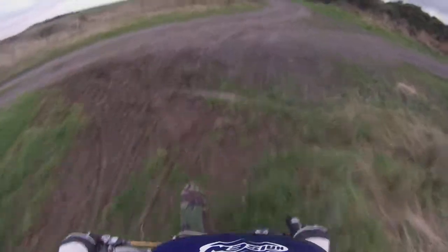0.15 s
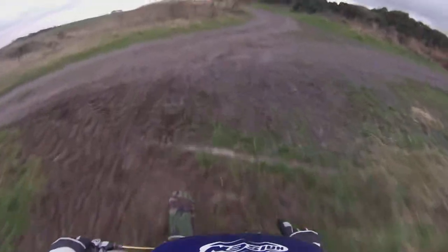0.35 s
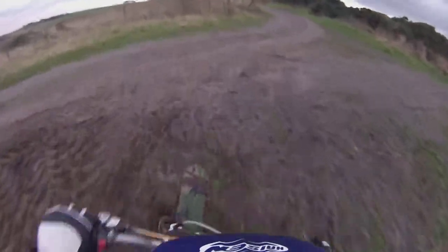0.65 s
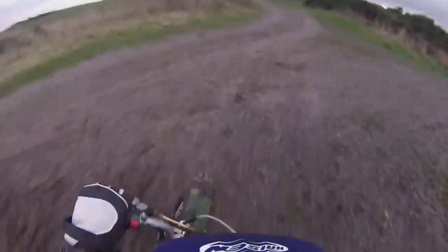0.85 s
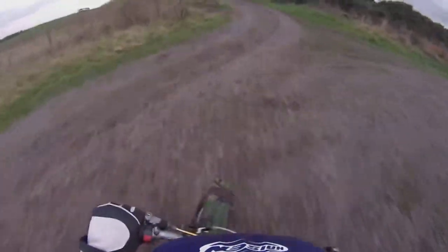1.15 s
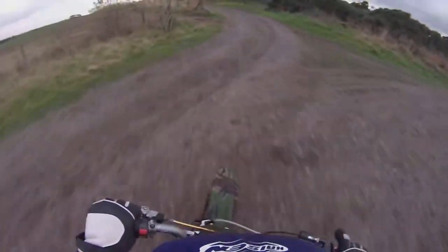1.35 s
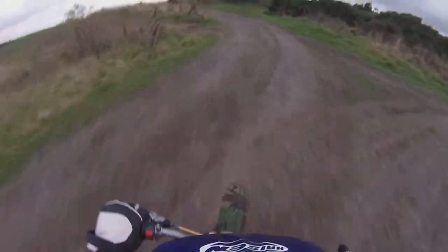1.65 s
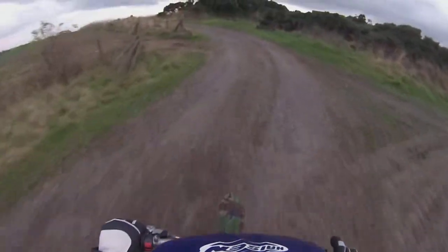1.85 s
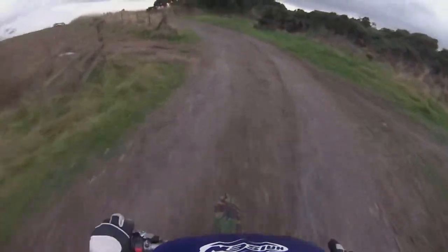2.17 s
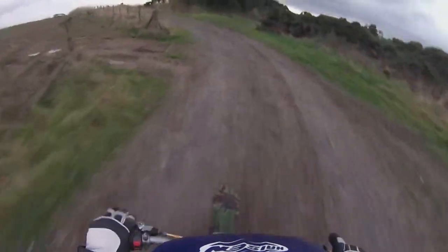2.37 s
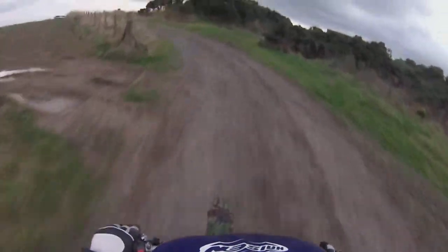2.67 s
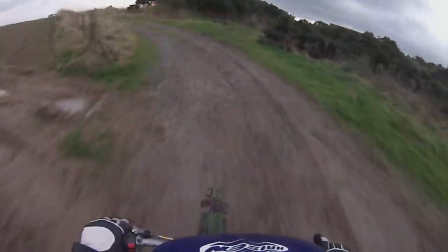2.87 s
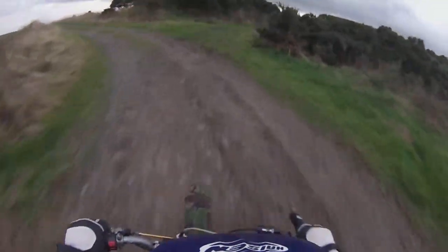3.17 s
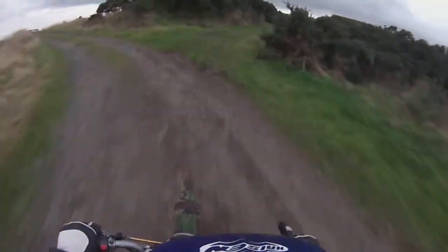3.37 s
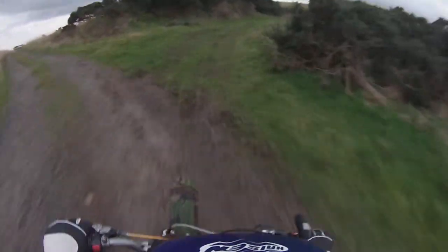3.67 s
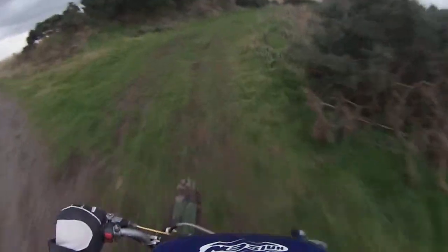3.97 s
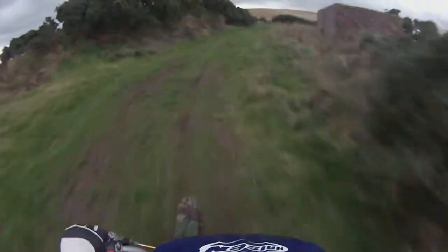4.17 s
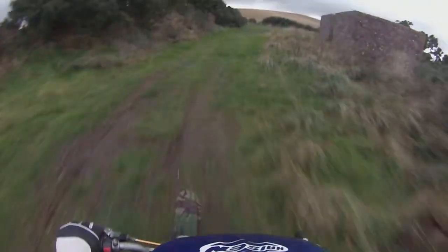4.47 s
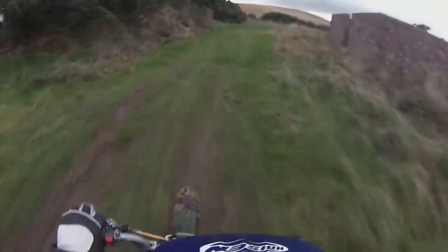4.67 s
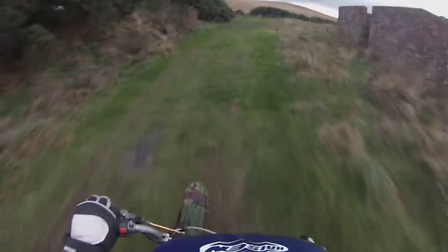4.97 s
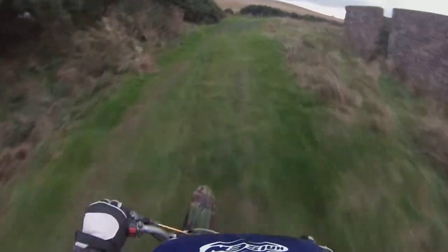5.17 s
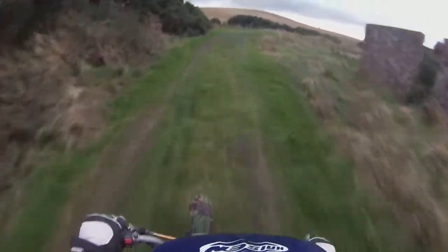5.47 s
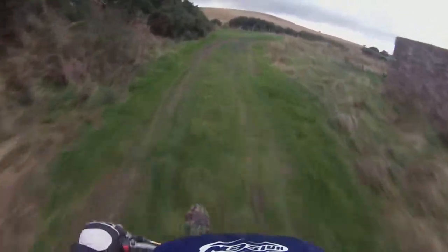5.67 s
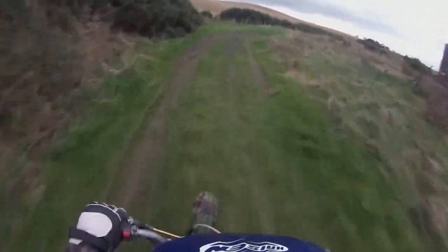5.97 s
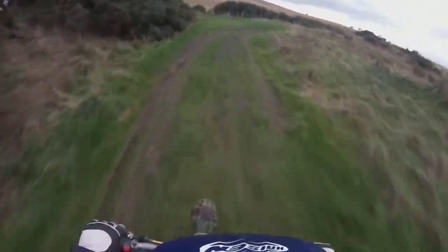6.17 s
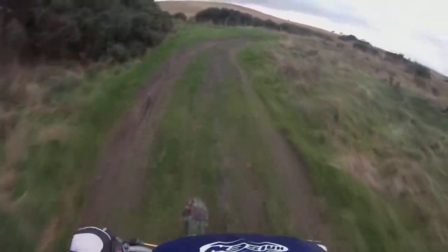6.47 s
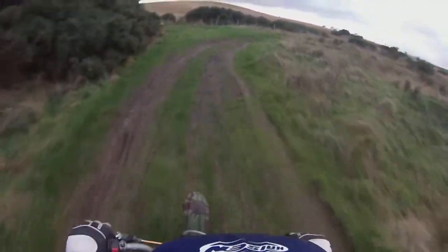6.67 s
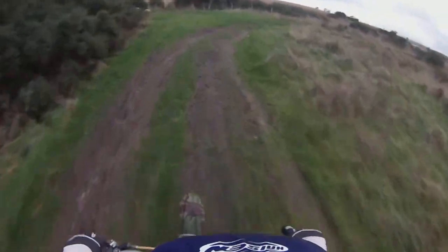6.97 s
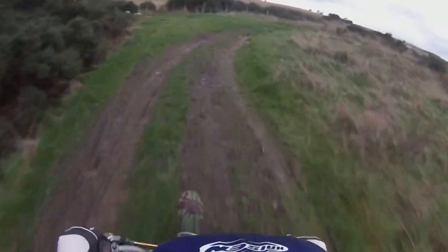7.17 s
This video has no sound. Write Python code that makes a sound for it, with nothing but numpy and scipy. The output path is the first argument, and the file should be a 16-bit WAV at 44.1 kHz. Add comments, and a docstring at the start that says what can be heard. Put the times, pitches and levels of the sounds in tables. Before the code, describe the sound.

Close on board a small four-stroke dirt bike, the engine putters low, then opens into a harsh rasping climb. The throttle snaps shut and the pitch falls, then it barks again with one quick dip. Finally it coasts down to a soft hum and clatter, with wind rumble, tyre churn, swishing grass and small knocks outdoors.

```python
"""A small four-stroke single-cylinder pit bike rides along a field track, heard from the rider's position.
It pulls up through the revs, shuts off briefly, pulls again, then coasts with the throttle nearly shut.
Each firing rings the exhaust and shakes out a rasp of noise, as strongly as throttle and engine speed dictate.
Gulps of air ring the air box, the engine clatters and hums, and bumps knock loose parts and chassis.
Shaped noise makes the tyres' churn, the swish of grass and the wind that buffets the microphone."""
import sys
import numpy as np
from scipy.fft import rfft, irfft, next_fast_len
from scipy.io import wavfile
from scipy.ndimage import uniform_filter1d, map_coordinates

SR = 44100
rng = np.random.default_rng(int(sys.argv[2]) if len(sys.argv) > 2 else 0)


def transcribe(signal):
    """Save signal, clipped to [-1, 1], as a 16-bit WAV file at the path in sys.argv[1]."""
    frames = np.atleast_2d(signal).T
    limited = np.clip(frames, -1, 1)
    pcm = np.round(limited * 32767).astype(np.int16)
    wavfile.write(sys.argv[1], SR, pcm)


N = 323253  # length in samples
TIME = np.arange(N) / SR  # seconds


def amp(db):
    """Turn decibels into gain."""
    return 10 ** (np.asarray(db) / 20)


def unit(x):
    """Scale a sound to an average (rms) level of 1."""
    return x / np.sqrt(np.mean(x ** 2) + 1e-20)


def curves(rows):
    """Join the points of each column after the time by straight lines, one value per sample."""
    point_s, *columns = np.transpose(rows)
    return [np.interp(TIME, point_s, column) for column in columns]


def wobble(rate):
    """Draw a smooth random curve through `rate` random points a second."""
    points = rng.standard_normal(int(N * rate / SR) + 4)
    return map_coordinates(points, [TIME * rate])


def filtered(x, response):
    """Filter x by a response that depends on frequency in Hz."""
    padded = next_fast_len(N + SR // 2)  # room for the ringing to die away
    hz = np.fft.rfftfreq(padded, 1 / SR)
    return irfft(rfft(x, padded) * response(hz), padded)[:N]


def coloured(x, spectrum):
    """Filter x to a spectrum of (pitch_hz, level_db) points, then scale to rms 1."""
    pitch_hz, level_db = np.transpose(spectrum)

    def response(hz):
        return amp(np.interp(np.log(hz + 1), np.log(pitch_hz), level_db))
    return unit(filtered(x, response))


def noise(spectrum):
    """Make steady random noise of the given spectrum, at rms 1."""
    return coloured(rng.standard_normal(N), spectrum)


def resonance(hz, centre, width):
    """Response of one part that rings at `centre` Hz; a narrower width in Hz rings longer."""
    return 1j * hz * width / (centre ** 2 - hz * hz + 1j * hz * width)


def resonate(x, modes, soft_hz, delay=0, alternate=False):
    """Let x, softened above soft_hz, ring the modes; alternating signs make the ring swell more slowly."""
    def response(hz):
        ring = 0
        for k, (pitch_hz, width_hz, level_db) in enumerate(modes):
            sign = (-1) ** (k * alternate)
            ring = ring + sign * amp(level_db) * resonance(hz, pitch_hz, width_hz)
        softening = np.exp(-(hz / soft_hz) ** 2)
        return ring * softening * np.exp(-2j * np.pi * hz * delay)  # delay in seconds
    return unit(filtered(x, response))


def gated(gate):
    """Shape white noise by a gate, evening out the gate's slow rise and fall."""
    slow_power = uniform_filter1d(gate ** 2, size=4410)  # averaged over 0.1 s
    return rng.standard_normal(N) * gate / np.sqrt(np.abs(slow_power))


def loudness(law, throttle, rate):
    """Gain of a layer, from throttle opening and engine speed."""
    # law: level_db at full throttle and cruising speed, loss_db on shutting, gain_db per doubling of speed
    full_db, shut_loss_db, db_per_octave = law
    cruise_rate = 50  # firings a second
    return amp(full_db - shut_loss_db * (1 - throttle) + db_per_octave * np.log2(rate / cruise_rate))


def combustion(throttle):
    """Strength of the firings, 0-1: a shut throttle leaves almost nothing to burn."""
    idle_opening, misfire_db = 0.18, 24  # firings fade below this opening, by this much when fully shut
    return amp(-misfire_db * np.clip(1 - throttle / idle_opening, 0, 1))


def pulses(times, scatter_db, jitter):
    """Make one click per firing or gulp, varying randomly in level (dB) and timing (s)."""
    chance = rng.standard_normal((len(times), 2))
    position = (times + jitter * chance[:, 0]) * SR
    # a short windowed sinc places each click between samples
    taps = np.floor(position)[:, None] + np.arange(-7, 9)
    offset = taps - position[:, None]
    shape = np.sinc(offset) * np.sinc(offset / 8) * amp(scatter_db * chance[:, 1:])
    samples = np.clip(taps, 0, N).astype(int)
    return np.bincount(samples.ravel(), shape.ravel(), N + 1)[:N]


def exhaust(times, throttle, rate):
    """Each burst of exhaust gas rings the pipe; an open throttle makes higher modes speak."""
    # resonances of the exhaust: pitch_hz, width_hz, level_db (relative)
    boom_modes = [(117.5, 37.4, 0)]
    putter_modes = [(167, 570, 0)]
    thump_modes = [(274, 68, -4.5), (347, 56, 3.5), (406.5, 64, 6), (413, 62, 0)]
    bark_modes = [(611, 91, 7), (686, 48, -9.5), (806.5, 27.5, 5), (1077, 51, 0.5)]
    crack_modes = [(1257, 117, 4), (1431, 147, 4.5), (1613, 83, 4.5), (1930, 75, -28)]
    # how loudness follows the engine: full_throttle_db, shut_loss_db, gain_db_per_octave of speed
    boom_law = (-30, 11.1, 5.6)
    putter_law = (-46, -6, -14)
    thump_law = (-23.5, 8.4, 2.7)
    bark_law = (-28.5, 16, 11.4)
    crack_law = (-28.5, 21.7, 6.1)

    firing = combustion(throttle)
    puffs = pulses(times, scatter_db=0.37, jitter=.00003)
    boom = loudness(boom_law, throttle, rate) * resonate(puffs, boom_modes, soft_hz=340)
    putter = loudness(putter_law, throttle, rate) * resonate(puffs, putter_modes, soft_hz=367)
    thump = loudness(thump_law, throttle, rate) * resonate(puffs, thump_modes, soft_hz=625)
    bark = loudness(bark_law, throttle, rate) * resonate(puffs, bark_modes, soft_hz=1360)

    def silencer(hz):  # cancels a narrow band
        return 1 - resonance(hz, centre=515.3, width=64)
    pipe = filtered(boom + firing * (putter + thump + bark), silencer)

    # the steep front cracks at once, and again, less evenly, after its trip along the pipe and back
    front_pulses = pulses(times, scatter_db=2.0, jitter=.00004)
    front = resonate(front_pulses, crack_modes, soft_hz=2560, alternate=True)
    return_pulses = pulses(times, scatter_db=5.0, jitter=0.00024)
    again = resonate(return_pulses, crack_modes, soft_hz=2600, delay=0.003124, alternate=True)
    crack = loudness(crack_law, throttle, rate) * (front + .65 * again)
    return -pipe - firing * crack


def intake(times, throttle, rate):
    """Half a cycle after each exhaust burst the piston gulps air, which favours the even harmonics."""
    # the air box, rung by each gulp: pitch_hz, width_hz, level_db (relative)
    air_box = [(312.6, 35, 0)]
    # loudness: full_throttle_db, shut_loss_db, gain_db_per_octave of speed
    intake_law = (-36.5, 18, 5)
    halfway = (times[:-1] + times[1:]) / 2
    gulps = pulses(halfway, scatter_db=2.5, jitter=.00005)
    level = combustion(throttle) * loudness(intake_law, throttle, rate)
    return -level * resonate(gulps, air_box, soft_hz=520)


def overrun(cycle, throttle, rate):
    """With the throttle shut the wheel turns the engine, whose pumping hums at multiples of its firing rate."""
    # the hum by engine speed: firings_per_s, level_db, high_rev_colour_share (0-1), waver_radians
    hum_by_speed = [(36.3, -48.5, 0, 1), (43.4, -35, 0.04, 0.53), (50, -40, 1, 0.47), (53.4, -37.5, 1, .2)]
    # the strength of each harmonic: multiple of the firing rate, low_rev_db, high_rev_db (both relative)
    hum_orders = [(2, 2, -11), (3, -3, -7), (4, -12.5, 3), (5, -7, -0.5), (6, -8.5, -3.5), (7, -12, -6),
                  (8, -18, -33), (9, -7, -22), (11, -18, -27), (12, -22, -13)]
    speeds, *columns = np.transpose(hum_by_speed)
    level_db, high_share, waver = [np.interp(rate, speeds, column) for column in columns]
    hum = 0
    for order, low_db, high_db in hum_orders:
        order_db = low_db + high_share * (high_db - low_db) + 2.9 * wobble(8.3)
        phase = 2 * np.pi * order * cycle + waver * wobble(16)
        hum = hum + amp(order_db) * np.cos(phase)
    return -np.sqrt(2) * (1 - combustion(throttle)) * amp(level_db) * hum


def burst(age, delay, width):
    """A swell that peaks when age equals delay and dies more slowly than it rose."""
    return np.exp(-.5 * (np.log((age + 1e-5) / delay) / width) ** 2)


def gas_and_clatter(times, cycle, throttle, rate):
    """Turbulent gas follows each firing; valve gear and chain keep clattering when the throttle is shut."""
    # spectra of the noises: pitch_hz, level_db (relative, per Hz)
    clatter_spectrum = [(700, -24.5), (1050, -19), (1300, -1), (1500, -1.5), (1750, -8), (2060, 2),
                        (2330, -9.5), (2650, -15), (3200, -28.5), (4500, -52)]
    rasp_spectrum = [(450, -47), (700, 1.5), (1000, -7), (1130, -16), (1290, 5), (1450, 3.5), (1620, -3),
                     (1800, 1), (2060, 5.5), (2300, -1), (2600, -18), (4500, -56.5)]
    hiss_spectrum = [(1800, -30), (2800, 0), (3500, 1), (4250, -2.5), (4750, -1), (5600, -9.5),
                     (6600, -19.5), (7700, -17), (9000, -24.5), (11500, -38), (13000, -56), (15000, -63)]
    # ringing of fins and engine covers: pitch_hz, width_hz, level_db (relative)
    casing_modes = [(2980, 104, 7), (3854, 150, 4), (4720, 180, -2.5), (5730, 170, -2.5), (6570, 450, -2.5),
                    (9030, 1000, -8), (10800, 910, -9)]
    # loudness: full_throttle_db, shut_loss_db, gain_db_per_octave of speed
    clatter_law = (-33.5, 5.6, 8.8)
    rasp_law = (-29.5, 17, 6)
    hiss_law = (-45.5, 12.2, 15.7)
    casing_law = (-50, 8.2, 5.2)

    last_firing = np.r_[-1, times][np.searchsorted(times, TIME)]
    age = TIME - last_firing  # seconds
    valves = burst(cycle % 1, delay=0.688, width=0.023)  # a valve seats late in every cycle
    clatter_gate = amp(1.6 * wobble(160)) * (1 + 0.25 * valves)
    clatter = coloured(gated(clatter_gate), clatter_spectrum)

    force = np.sqrt(throttle) * amp(1.6 * wobble(50))
    rasp_gate = force * burst(age, delay=0.0029, width=0.76) + 0.0082
    rasp = combustion(throttle) * coloured(gated(rasp_gate), rasp_spectrum)

    spit = 3 * burst(age, delay=.0008, width=.6) + 1.5 * burst(age, delay=.005, width=.5)
    hiss = coloured(gated(amp(1.6 * wobble(160)) + force * spit), hiss_spectrum)
    casing_gate = amp(2.7 * wobble(220)) * (1 + 0.71 * force * spit)
    casing = resonate(gated(casing_gate), casing_modes, soft_hz=8560, alternate=True)

    layers = [(clatter, clatter_law), (rasp, rasp_law), (hiss, hiss_law), (casing, casing_law)]
    return sum(sound * loudness(law, throttle, rate) * amp(.7 * wobble(8)) for sound, law in layers)


def wind():
    """Lumpy low noise of air buffeting the microphone, with gusts and lulls."""
    # gusts and lulls: middle_s, half_length_s, level_db over the breeze
    gusts = [(0.857, 0.28, 9), (1.7, 0.59, -3.5), (4.206, .7, 6.5), (5.544, .5, 8), (6.71, 0.059, 4.5)]
    # spectrum of the buffeting: pitch_hz, level_db (relative, per Hz)
    buffet_spectrum = [(6, -7), (18, 7.5), (35, -16), (55, -11), (85, -5.5), (150, -22), (300, -25),
                       (700, -43.5), (2000, -78)]
    wind_db = -34  # the breeze between gusts
    for middle_s, half_s, level_db in gusts:
        wind_db = wind_db + level_db * np.exp(-((TIME - middle_s) / half_s) ** 2)
    return amp(wind_db) * unit(amp(1.4 * wobble(9.8)) * noise(buffet_spectrum))


def tyres(throttle, rate):
    """Knobbly tyres churn the track as lumpy noise, louder as the bike works harder."""
    # spectrum of the churn: pitch_hz, level_db (relative, per Hz)
    churn_spectrum = [(50, -4), (85, 10), (170, 0), (290, 1), (420, 3), (510, -5.5), (620, -9.5),
                      (900, -10), (1300, -4), (3000, -42.5)]
    # loudness: full_throttle_db, shut_loss_db, gain_db_per_octave of speed
    churn_law = (-37.5, 3.8, 3.6)
    lumps_db = 1.8 * wobble(25)
    return loudness(churn_law, throttle, rate) * amp(lumps_db) * noise(churn_spectrum)


def grass():
    """Grass brushing past makes a flickering swish of noise."""
    # rush of the bike through grass: time_s, level_db
    grass_levels = [(3.6, -63), (3.85, -37.5), (4.3, -33), (5.3, -32.5), (5.65, -30.5), (6.03, -38),
                    (6.25, -34), (6.4, -43), (6.8, -52), (7.0, -43.5), (7.33, -48)]
    # spectrum of the swish: pitch_hz, level_db (relative, per Hz)
    swish_spectrum = [(350, -40), (600, -9), (765, -14), (974, -18), (1310, 1), (1520, -3.5), (2020, -5.5),
                      (3750, -21.5), (4230, -26), (6600, -30), (8520, -44), (11000, -46), (15000, -69)]
    grass_db, = curves(grass_levels)
    return amp(grass_db + 1.2 * wobble(30)) * noise(swish_spectrum)


def after(events, t60):
    """Rise in about a millisecond at each (start_s, level_db), then fall 60 dB every t60 seconds."""
    envelope = 0
    for start_s, level_db in events:
        age = np.maximum(TIME - start_s, 0)
        rise = 1 - np.exp(-(age / .001) ** 2)
        envelope = envelope + amp(level_db - 60 * age / t60) * rise
    return envelope


def rattles():
    """Bumps shake bright ticks and duller knocks out of the bike, as short bursts of noise."""
    # bright ticks of loose parts: start_s, level_db (before the trim below)
    jolts = [(1.4376, -34), (1.943, -35), (3.8994, -41), (6.5286, -45), (6.6844, -38)]
    # knocks of the chassis over bumps: start_s, level_db (before the trim below)
    chassis_knocks = [(3.499, -22.5), (6.2542, -23), (6.9321, -31)]
    tick_spectrum = [(1500, -32), (4000, 7), (7000, -2), (11000, -14), (15000, -28)]
    knock_spectrum = [(500, -32), (1000, -3), (1350, 9), (2100, -7), (3500, -24), (12000, -85)]
    ticks = after(jolts, t60=.06) * noise(tick_spectrum)
    knocks = after(chassis_knocks, t60=0.036) * noise(knock_spectrum)
    return amp(-13.5) * ticks + amp(-2.5) * knocks


def scene():
    """The crank sets the firing times; throttle and speed set the strength of every engine sound."""
    # engine speed: time_s, firings_per_s
    speed_points = [(0.0, 35.11), (0.6, 39.72), (0.72, 42.31), (0.91, 39.48), (1.23, 42.87), (1.38, 39.06),
                    (1.5, 42.64), (1.6, 42.02), (1.67, 45.24), (2.14, 52.1), (2.25, 55.74), (2.38, 55.61),
                    (2.48, 58.65), (2.55, 57.76), (3.1, 63.1), (3.34, 55.46), (3.58, 43.57), (3.66, 45.2),
                    (4.1, 47.0), (4.22, 43.57), (4.35, 46.41), (4.55, 45.91), (4.84, 49.64), (5.02, 49.27),
                    (5.26, 51.78), (5.48, 43.98), (6.44, 36.61), (7.33, 36.32)]
    # the rider's hand: time_s, throttle_opening (0-1)
    throttle_points = [(0, .16), (.35, 0.17), (.75, 0.38), (.95, 0.39), (1.2, 0.43), (1.4, 0.35),
                       (1.49, 0.81), (1.82, 0.88), (2.3, .8), (3.09, 0.84), (3.19, 0.08), (3.55, 0.05),
                       (3.7, 0.76), (3.98, 0.9), (4.19, 0.12), (4.3, 0.92), (5.25, 0.91), (5.34, 0.09),
                       (6.6, 0), (7.33, 0.07)]
    rate, = curves(speed_points)
    throttle = np.clip(curves(throttle_points)[0], 0, 1)
    cycle = np.cumsum(rate) / SR + .534  # running count of engine cycles, one firing in each
    times = np.interp(np.arange(1, int(cycle[-1]) + 1), cycle, TIME)  # firing times in seconds
    engine = exhaust(times, throttle, rate) + intake(times, throttle, rate)
    engine = engine + overrun(cycle, throttle, rate) + gas_and_clatter(times, cycle, throttle, rate)
    surroundings = wind() + tyres(throttle, rate) + grass()
    return (engine + surroundings + rattles())[None]


def record(dry):
    """Round the highest peaks, dull the top treble and leave silence above top_hz."""
    top_hz, dulling_hz, ceiling = 15150, 12700, .52
    rounded = dry[0] / (1 + (dry[0] / ceiling) ** 4) ** (1 / 4)

    def response(hz):
        return (hz < top_hz) / np.sqrt(1 + (hz / dulling_hz) ** 16)
    return filtered(rounded, response)[None]


dry = scene()
out = record(dry)
transcribe(out)
```